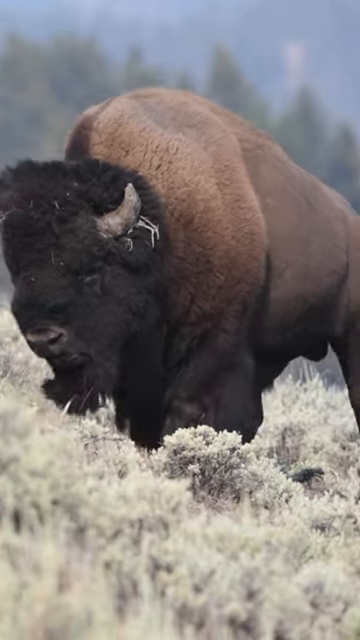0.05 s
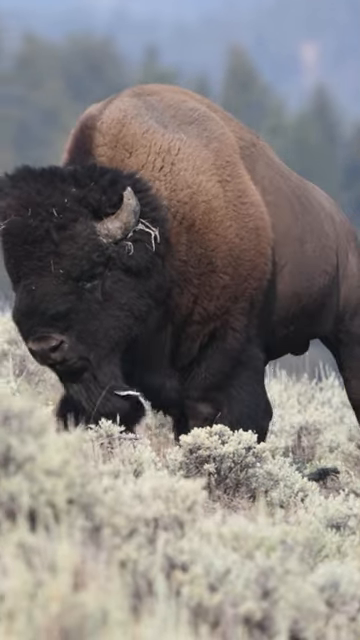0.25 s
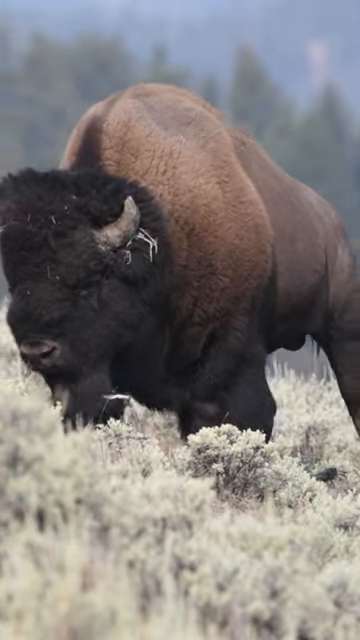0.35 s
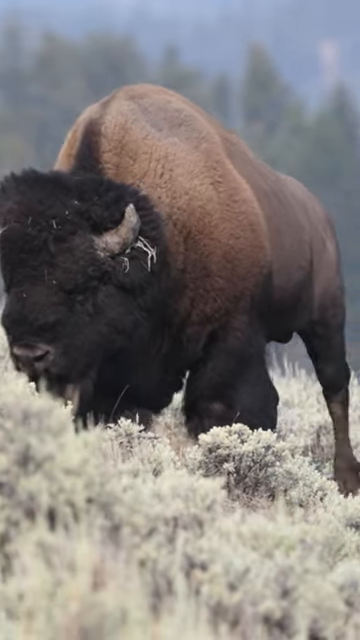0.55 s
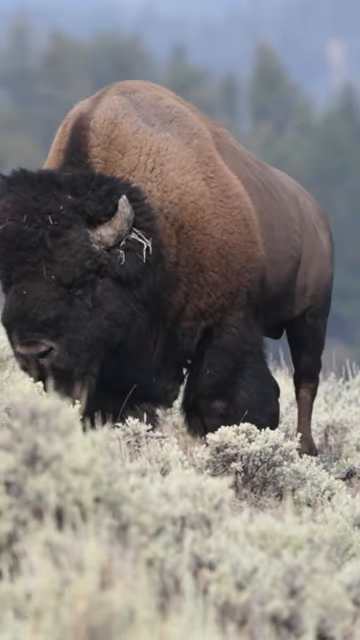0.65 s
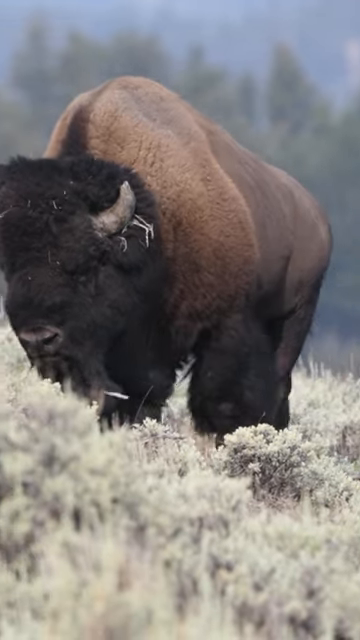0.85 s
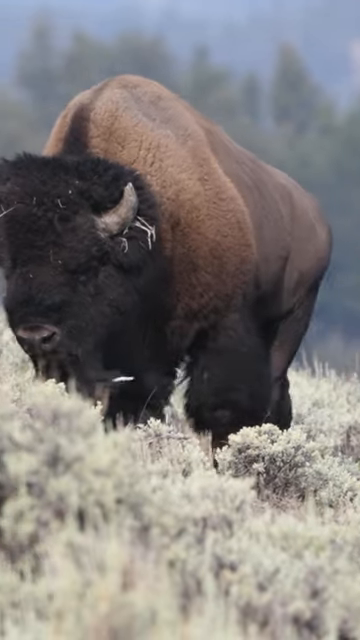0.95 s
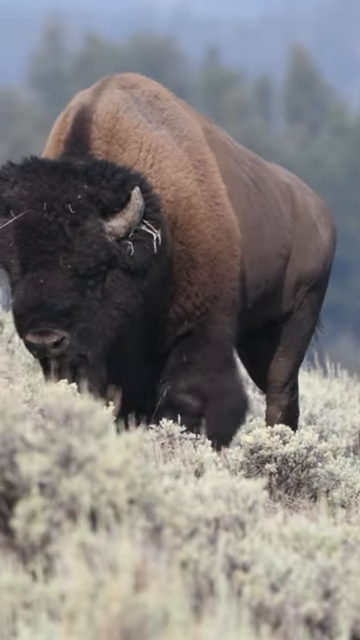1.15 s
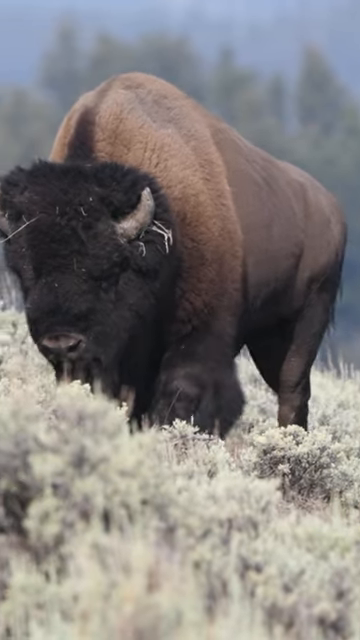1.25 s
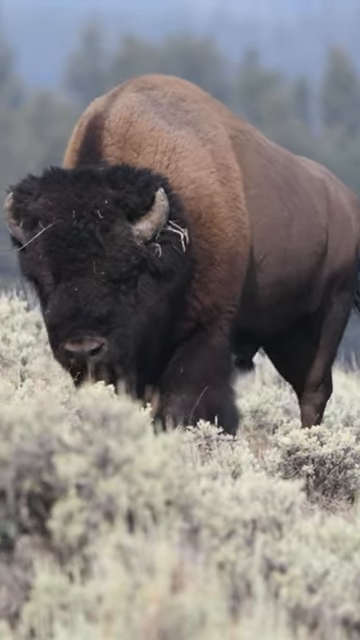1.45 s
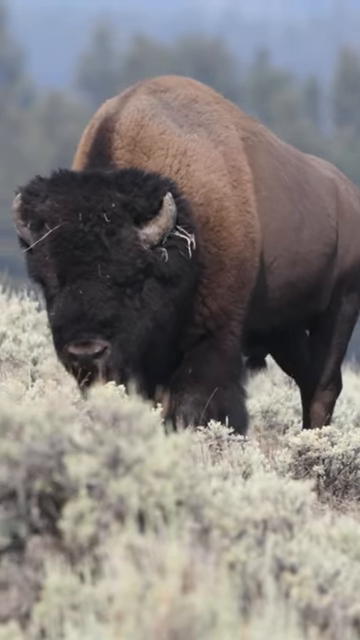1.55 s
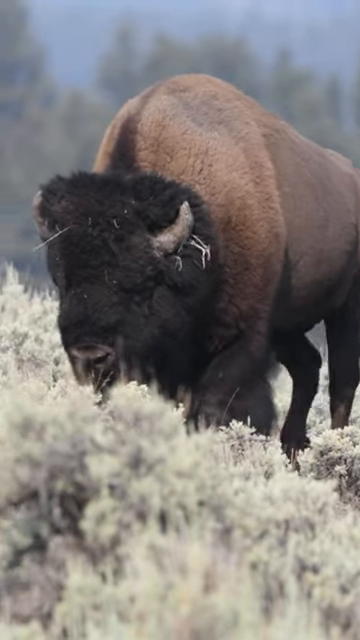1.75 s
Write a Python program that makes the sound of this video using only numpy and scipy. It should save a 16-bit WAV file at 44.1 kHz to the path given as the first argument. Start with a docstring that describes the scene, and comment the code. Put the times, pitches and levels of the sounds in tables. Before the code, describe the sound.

One deep, breathy bison grunt trails off, followed by soft hoof thuds and twig scrapes.

```python
"""One low, rattling bellow from a bison bull walking through dry brush.
Slow flaps of the vocal folds ring his throat; air hisses from the muzzle,
and the call trails off in an uneven rumble.
Twigs scrape on his legs and his hooves thud, over faint wind on the open plain."""
import sys
import numpy as np
from scipy import signal
from scipy.io import wavfile
from scipy.ndimage import uniform_filter1d

SR = 44100
rng = np.random.default_rng(int(sys.argv[2]) if len(sys.argv) > 2 else 0)


def put_to_file(sound):
    """Save the sound as 16-bit audio at rate SR, in the file named by the first command-line argument."""
    columns = np.atleast_2d(sound).T  # one column per channel
    safe = np.clip(columns, -1, 1)
    whole_steps = np.round(safe * 32767)
    wavfile.write(sys.argv[1], SR, whole_steps.astype(np.int16))


N = 79380
T = np.arange(N) / SR


def fold_flaps(first_s=0.207, last_s=1.27, jitter_s=0.0028, shimmer_db=1):
    """One click per closing of the vocal folds; roughness scales jitter and shimmer."""
    # fold motion: t/s, flap rate/Hz, roughness/0-1
    folds = [(.2, 54.3, 0), (.32, 58.3, 0.07), (.39, 50.3, 0.01), (.46, 49, 0.11), (.482, 52.3, 0.11),
             (.497, 61.5, 0.09), (.52, 50, 0.02), (.55, 44.7, 0.17), (.62, 44, 0.46), (.72, 44, 0.48),
             (.8, 44.5, 0), (.92, 43.4, 0.14), (1.02, 36.7, 0.48), (1.35, 40.7, 0.48)]
    cycles = np.cumsum(curve(folds, T)) / SR
    cycles -= np.interp(first_s, T, cycles)
    flap_s = np.interp(np.arange(np.interp(last_s, T, cycles)), cycles, T)
    roughness = curve(folds, flap_s, column=2)
    lag, weakness = rng.standard_normal((100, 2))[:len(flap_s)].T * roughness
    onsets = np.round((flap_s + jitter_s * lag) * SR).astype(int)
    clicks = np.zeros(N)
    clicks[onsets] = amp(-shimmer_db * np.clip(weakness, -1, 1))
    return clicks


def bellow(clicks):
    """Flaps ring the two lowest resonances of the long throat and clack in the upper ones."""
    # flap force: t/s, level/dB
    effort = [(.2, -15), (.26, -8.5), (.315, -10), (.355, -0.5), (.41, -0.5), (.45, -1), (.47, -12.5),
              (.49, 0), (.505, -3.5), (.525, -4.5), (.547, -1.5), (.563, -11.5), (.645, -14), (.68, -8.5),
              (.725, -14.5), (.795, -8.5), (.9, -17), (.96, -21), (1.01, -13), (1.07, -21), (1.125, -10.5),
              (1.18, -23.5), (1.24, -10), (1.3, -43)]
    # lowest resonance, sinking as the call relaxes: t/s, f/Hz
    first_mode = [(.2, 249.4), (.33, 255), (.44, 246), (.55, 244.6), (.68, 209), (.85, 225.6), (1.05, 208),
                  (1.25, 198)]
    # second resonance, strong while the mouth opens: t/s, f/Hz, level/dB
    second_mode = [(.22, 650, -64), (.3, 630, -44.5), (.385, 593, -38.5), (.412, 597, -62), (.53, 560, -48),
                   (.6, 550, -62), (.8, 526, -46), (1, 505, -62)]
    # flap sharpness: t/s, level/dB
    snap = [(.2, 3), (.26, -5.5), (.3, 4), (.35, -3), (.41, -8), (.5, -9), (.6, -25), (.85, -10),
            (1.1, -28)]
    # upper resonances: f/Hz, width/Hz, level/dB
    clack_modes = [(990, 140, -51), (1320, 245, -39), (1730, 420, -41), (2500, 400, -51)]
    first = ring(clicks * amp(curve(effort, T)), curve(first_mode, T), width_hz=22.9)
    first = amp(-20.5) * band(first, 106, 390, order=2)  # the soft folds push mostly here
    second_drive = clicks * amp(curve(second_mode, T, column=2))
    second = ring(second_drive, curve(second_mode, T), width_hz=41)
    second = band(second, 510, 700, order=1)  # keeps the valley below it dark
    clack_drive = clicks * amp(curve(snap, T))
    clack = sum((-1) ** k * amp(db) * ring(clack_drive, hz, width_hz)
                for k, (hz, width_hz, db) in enumerate(clack_modes))
    return second - first + clack


def muzzle_air(clicks, puff_s=0.0028, puff_depth=0.87):
    """Hiss that puffs with each flap and brightens as the bull pushes out his air."""
    # breath: t/s, level/dB, brightness/0-1
    breath = [(.17, -61, 0), (.28, -58.5, 0.6), (.38, -51, 0.07), (.46, -50.5, .6), (.505, -48, 0.42),
              (.53, -51, 0.43), (.585, -48, 0.93), (.64, -47.5, 1), (.665, -55, .9), (.735, -52, 1),
              (.78, -59, 0.8), (.95, -63, .2), (1.15, -72, 0)]
    # dull air spectrum: f/Hz, relative level/dB
    dull = [(200, -34), (500, 10), (1200, 6), (2000, 0), (2800, 3), (4500, -10), (8000, -12.5),
            (16000, -16)]
    # bright air spectrum: f/Hz, relative level/dB
    bright = [(200, 10.5), (600, 3.5), (1200, -7), (2000, -5), (3800, -11.5), (5700, -5.5), (9000, -15),
              (16000, -18)]
    # muzzle resonances: f/Hz, width/Hz, lift/dB
    muzzle_modes = [(1250, 160, 1.5), (1900, 760, 8), (3067, 143, 8), (4300, 590, 6.5), (5240, 410, 0.5),
                    (6100, 400, 1.5), (8560, 530, 5)]

    def spectrum_db(t, hz):
        brightness = np.clip(curve(breath, t, column=2), 0, 1)
        db = (1 - brightness) * colour(dull, hz) + brightness * colour(bright, hz)
        db += sum(lift_db / (1 + (2 * (hz - mode_hz) / width_hz) ** 2)
                  for mode_hz, width_hz, lift_db in muzzle_modes)
        return db - 10 * np.log10(np.mean(amp(db) ** 2, axis=1, keepdims=True))  # constant power

    puff = np.exp(-((T - T.mean()) / puff_s) ** 2)
    puffs = 1 + puff_depth * signal.fftconvolve(np.sign(clicks), puff, "same")
    hiss = noise(spectrum_db, patchy_db=4.5, fft_size=512)
    return hiss * unit(puffs) * amp(curve(breath, T))


def hooves():
    """Soft, low thuds on dry soil, each a Gaussian tone pulse."""
    # hoof falls: t/s, f/Hz, half-length/s, level/dB
    thuds = [(0.843, 95.9, 0.0061, -41), (1.466, 86.98, 0.007, -31), (1.607, 101, 0.011, -37.5)]
    return sum(amp(db) * np.exp(-((T - at_s) / half_s) ** 2) * np.cos(2 * np.pi * hz * (T - at_s))
               for at_s, hz, half_s, db in thuds)


def twig_scrapes(slips_per_s=3000):
    """Each scrape is a quick run of tiny slips that ring a dry twig."""
    # scrapes: t/s, length/s, level/dB, centre/Hz, spread/octaves
    scrapes = [(0.835, 0.037, -57, 3400, 1.575), (1.332, 0.019, -61.5, 3690, .25),
               (1.639, 0.03, -62, 3700, 0.3), (1.709, 0.031, -51.5, 2700, 0.83)]
    # twig resonances: f/Hz, width/Hz, relative level/dB
    twig_modes = [(1698.6, 210, 2), (1930, 210, 1), (2730, 280, 4), (3148, 380, 3), (3470, 560, 3.5),
                  (4220, 120, 1), (4970, 440, 3)]
    out = np.zeros(N)
    for start_s, length_s, db, centre_hz, spread_oct in scrapes:
        arch = np.sin(np.pi * np.clip((T - start_s) / length_s, 0, 1) ** 1.2)
        slips = arch * rng.standard_normal(N) * (rng.random(N) < slips_per_s / SR)
        scrape = np.zeros(N)
        for k, (hz, width_hz, mode_db) in enumerate(twig_modes):
            weight = np.exp(-(np.log2(hz / centre_hz) / spread_oct) ** 2)
            scrape += (-1) ** k * amp(mode_db) * np.sqrt(width_hz) * weight * ring(slips, hz, width_hz)
        out += amp(db) * unit(scrape) * np.sqrt(length_s * SR / N)  # level as rms over the scrape
    return out


def wind(level_db=-44.5):
    """Low rumble and faint wide hiss of moving air."""
    # wind spectrum: f/Hz, relative level/dB
    spectrum = [(20, -55), (40, -17.5), (65, -5.5), (90, -4.5), (135, -0.5), (190, -9), (260, -7),
                (310, -13), (390, -16), (480, -15.5), (600, -16.5), (760, -20.5), (980, -17), (1400, -24.5),
                (2050, -25), (2550, -32.5), (4000, -34.5), (8000, -37), (15500, -40.5)]
    return amp(level_db) * noise(lambda t, hz: colour(spectrum, hz), patchy_db=1, fft_size=2048)


def amp(db):
    """Decibels to gain."""
    return 10 ** (np.asarray(db) / 20)


def unit(x):
    """Scale to rms 1."""
    return x / np.sqrt(np.mean(x ** 2) + 1e-20)


def curve(table, t, column=1):
    """Interpolate one column of a time table."""
    rows = np.array(table)
    return np.interp(t, rows[:, 0], rows[:, column])


def colour(table, hz):
    """Interpolate a dB spectrum over log frequency."""
    knot_hz, db = np.transpose(table)
    return np.interp(np.log(hz + 1), np.log(knot_hz + 1), db)


def ring(x, hz, width_hz):
    """Steady or gliding resonance; a unit click rings at height 1."""
    phasor = np.exp(2j * np.pi * np.cumsum(hz * np.ones(len(x))) / SR)
    pole = np.exp(-np.pi * width_hz / SR)
    return (phasor * signal.lfilter([1], [1, -pole], x / phasor + 1e-18)).imag


def band(x, low_hz, high_hz, order):
    """Butterworth band-pass."""
    return signal.sosfilt(signal.butter(order, [low_hz, high_hz], "band", fs=SR, output="sos"), x)


def noise(spectrum_db, patchy_db, fft_size):
    """Unit-rms noise shaped by spectrum_db(t, hz), with small random patches in level."""
    hop = fft_size // 4
    frames = N // hop + 5
    t = np.arange(frames)[:, None] * hop / SR
    hz = np.fft.rfftfreq(fft_size, 1 / SR)
    real, imag, patches = rng.standard_normal((3, frames, len(hz)))
    patches = unit(uniform_filter1d(uniform_filter1d(patches, size=7, axis=0), size=7, axis=1))
    bins = (real + 1j * imag) * amp(spectrum_db(t, hz) + patchy_db * patches)
    return unit(signal.istft(bins.T, nperseg=fft_size, noverlap=fft_size - hop)[1][:N])


def scene():
    """Bull, brush and wind in the open; mono, no echo."""
    clicks = fold_flaps()
    return (bellow(clicks) + muzzle_air(clicks) + wind() + twig_scrapes() + hooves())[None]


def record(dry, cutoff_hz=15650):
    """Steep low-pass."""
    lowpass = signal.firwin(511, cutoff_hz, window=("kaiser", 9), fs=SR)
    return signal.oaconvolve(dry, lowpass[None], "same")


dry = scene()
out = record(dry)
put_to_file(out)
```